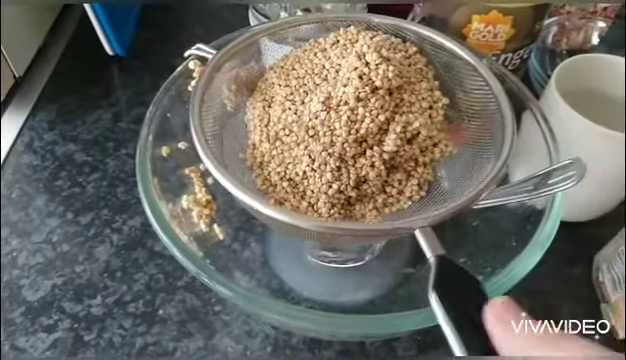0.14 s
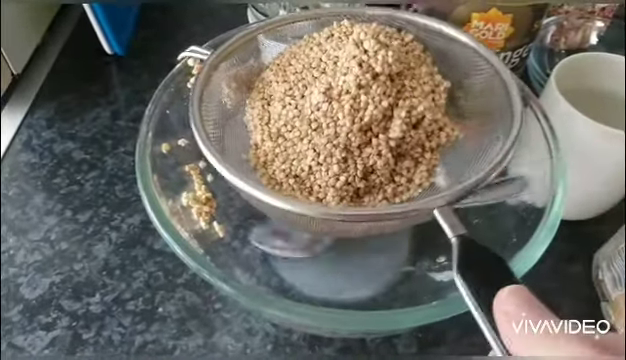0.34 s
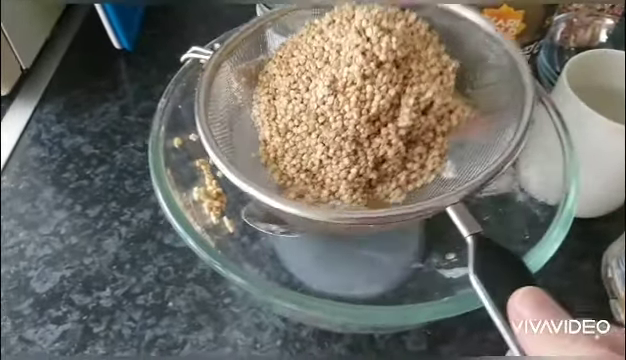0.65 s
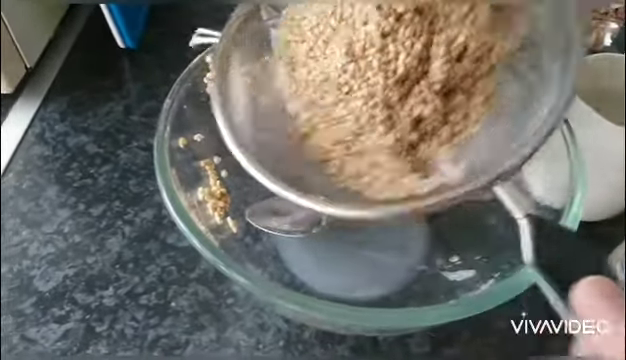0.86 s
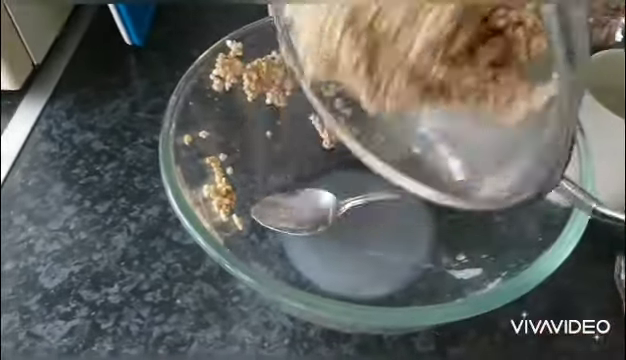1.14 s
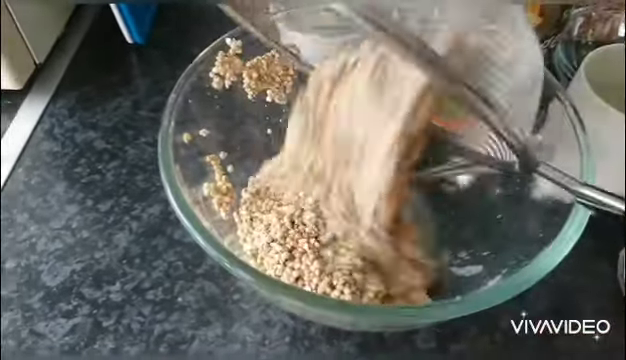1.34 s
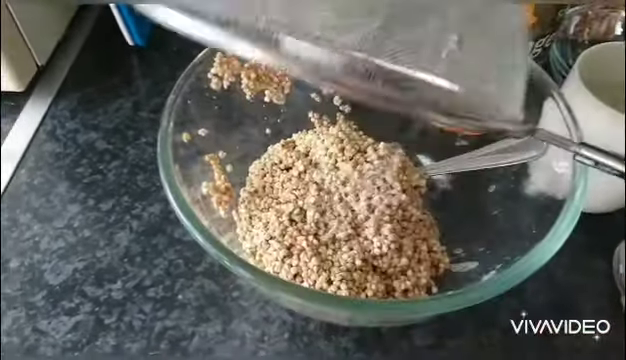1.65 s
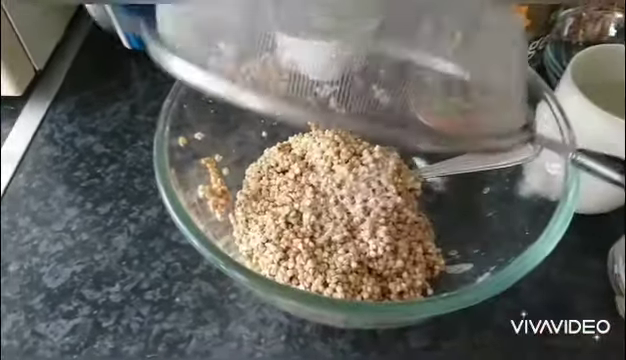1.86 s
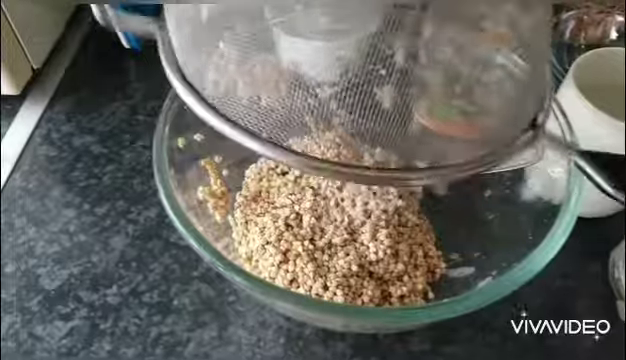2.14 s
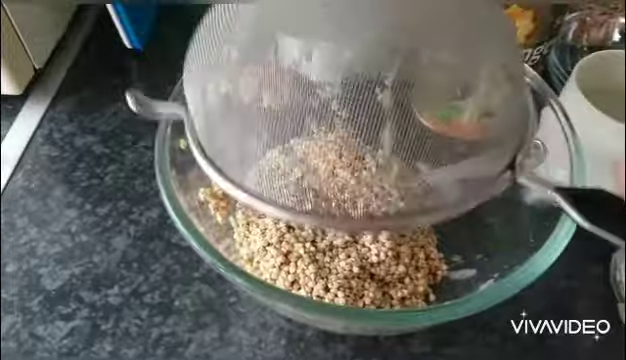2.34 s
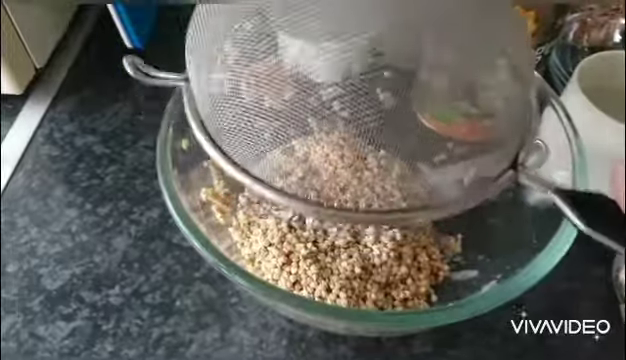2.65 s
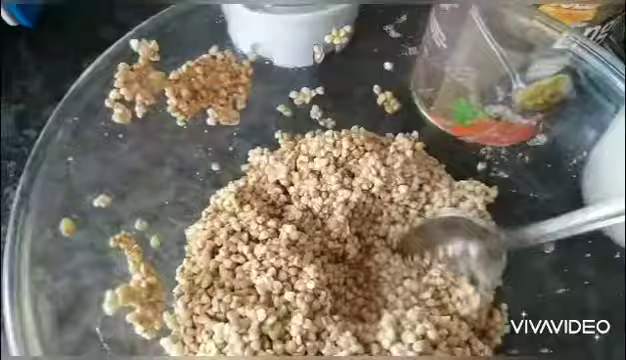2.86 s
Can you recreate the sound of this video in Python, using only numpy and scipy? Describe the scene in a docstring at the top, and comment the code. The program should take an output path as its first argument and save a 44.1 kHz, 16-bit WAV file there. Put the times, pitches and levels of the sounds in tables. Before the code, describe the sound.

A metal sieve scrapes, catches and briefly squeaks on a glass bowl, knocks it, then grain drops with a hiss and soft thud; five sharp rattling raps follow in a small kitchen, heard close in stereo.

```python
"""A steel sieve full of grain drags over the rim of a glass bowl, ticking, catching and squeaking, then knocks it.
The grain is tipped out with a hiss and a soft thud; five knocks on the rim empty the sieve; a hand rustles last.
Decaying modes make the glass and steel ring; tiny random impacts make the friction, mesh rattle and grain.
A small kitchen answers; the phone close by, its left port facing the bowl, limits the hardest knocks."""
import sys
import numpy as np
from scipy import signal
from scipy.fft import rfft, irfft, next_fast_len
from scipy.io import wavfile
from scipy.ndimage import uniform_filter1d, minimum_filter1d, map_coordinates

SR = 44100
rng = np.random.default_rng(int(sys.argv[2]) if len(sys.argv) > 2 else 0)


def materialize(psi):
    """Save the field psi as 16-bit PCM at rate SR to the path in sys.argv[1].

    A 1-D psi becomes a single channel; in a 2-D psi each row is a channel.
    """
    bounded = np.clip(np.atleast_2d(psi).T, -1, 1)
    quanta = np.round(bounded * 32767).astype(np.int16)
    wavfile.write(sys.argv[1], SR, quanta)


N = 132300
T = np.arange(SR * 3 // 4) / SR  # time within one contact (s)
CLACK_T60 = 0.039  # s

# the five main modes of the bowl; where the rim is struck decides how hard each rings: pitch_hz
MAIN_MODES_HZ = [1162, 2111, 3295, 4711, 6330]
# spectrum of the low thud of the heap, also the rumble under the drag: frequency_hz, level_db
HEAP_SPECTRUM = [(25, -33), (45, -12), (68, -3.5), (88, 5), (115, -15), (160, -11.5), (220, -25.5),
                 (500, -23), (1500, -82)]


def amp(db):
    """Decibels to gain."""
    return 10 ** (np.asarray(db) / 20)


def unit(x):
    """Scale to rms 1."""
    return x / np.sqrt(np.mean(x ** 2) + 1e-20)


def along(points, hz):
    """Interpolate (Hz, value) points on a log frequency axis."""
    f, v = np.transpose(points)
    return np.interp(np.log(hz + 1), np.log(f + 1), v)


def level(rows):
    """Gain per sample from (s, dB) rows, practically silent outside them."""
    s, db = np.transpose(rows)
    return amp(np.interp(np.arange(N) / SR, s, db, left=-140, right=-140))


def fade(t60):
    """Exponential decay by 60 dB in t60 seconds."""
    return amp(-60 * T / t60)


def add(out, s, x):
    """Mix x into out at time s, cut at the end of out."""
    part = out[:, round(s * SR):][:, :x.shape[-1]]
    part += x[..., :part.shape[-1]]


def filtered(x, response):
    """Multiply the spectrum of x by a response of frequency."""
    n = x.shape[-1]
    m = next_fast_len(n + SR // 4)
    gain = response(np.fft.rfftfreq(m, 1 / SR))
    return irfft(rfft(x, m) * gain, m)[..., :n]


def wander(points, t, rate):
    """A smooth random curve through `rate` random points per second."""
    return map_coordinates(rng.standard_normal(points), [t * rate], mode="nearest")


def grains(size, rate, spread_db):
    """Two random trains of tiny impacts of uneven strength, `rate` per second."""
    hits = rng.random((2, size)) < rate / SR
    sign = rng.choice([-1, 1], (2, size))
    return hits * sign * amp(spread_db * rng.standard_normal((2, size)))


def coloured(pair, spectrum, tilt_db=0):
    """Two excitations become a partly alike stereo pair of rms 1; tilt_db is per octave."""
    # how alike the two ports are: frequency_hz, correlation (0-1)
    port_likeness = [(100, 0.89), (500, 0.52), (2000, 0.28), (10000, 0.44)]

    def mid_side(hz):
        turn = np.arccos(np.clip(along(port_likeness, hz), -1, 1)) / 2
        colour = amp(along(spectrum, hz) + tilt_db * np.log2(hz + 20))
        return colour * [np.cos(turn), np.sin(turn)]

    mid, side = filtered(pair, mid_side)
    return unit(np.array([mid + side, mid - side]))


def noise(size, spectrum, tilt_db=0):
    """Coloured stereo noise of rms 1."""
    return coloured(rng.standard_normal((2, size)), spectrum, tilt_db)


def background():
    """Steady quiet noise under the whole scene."""
    # spectrum of the background: frequency_hz, level_db
    floor_spectrum = [(25, -25.5), (50, -15), (85, -0.5), (125, -9.5), (210, -5.5), (300, -10),
                      (510, -14.5), (1340, -18), (3300, -19), (7000, -22.5), (11000, -29.5), (12500, -47.5)]
    return amp(-64) * noise(N, floor_spectrum)


def ticks():
    """Light ticks of steel and of late single grains, without any ring of the bowl: short bright and dull bursts."""
    # the ticks: start_s, level_db, dull_part_db (relative to the bright part)
    light_ticks = [(0.0672, -41.5, 14), (.073, -56, 9.5), (1.0643, -34.5, -20), (1.2672, -23, -15),
                   (1.445, -46, 8.5), (1.486, -49.5, -2), (1.5422, -51.5, -1), (1.6156, -58.5, 1.5),
                   (1.648, -56, -2.5), (1.7258, -26, -34), (1.781, -40, -16), (2.2189, -55.5, 10),
                   (2.2394, -19.5, -40.5), (2.4289, -39, -14), (2.457, -40.5, -10), (2.6436, -38, -16.5)]
    # spectrum of the bright part: frequency_hz, level_db
    bright_spectrum = [(300, -42.5), (3500, -42.5), (5000, -9.5), (6200, -4.5), (7050, 4), (7900, -17.5),
                       (11000, -26.5), (13000, -55)]
    # spectrum of the dull part: frequency_hz, level_db
    dull_spectrum = [(200, -19), (1400, -15), (2400, 5.5), (3600, -2.5), (5000, -3), (9000, -12.5),
                     (11500, -22.5), (13000, -35.5)]
    tick_t60 = 0.046  # s
    out = np.zeros((2, N))
    for s, db, dull_db in light_ticks:
        bright = noise(len(T), bright_spectrum)
        dull = amp(dull_db) * noise(len(T), dull_spectrum)
        add(out, s, amp(db) * (bright + dull) * fade(tick_t60))
    return out


def ringing(hz, t60):
    """One decaying mode; unsteady contact makes its phase waver, high modes more than low ones."""
    waver_rad, waver_rate, full_waver_hz = 0.326, 90, 4000  # depth, points per s, full depth from here up
    waver = wander(400, T, waver_rate)
    depth = waver_rad * min(1, hz / full_waver_hz)
    return np.sin(2 * np.pi * (hz * T + rng.random()) + depth * waver) * fade(t60)


def glass(main_db, low_hz=100, vary_db=1):
    """One ring of the bowl as a sum of modes, the main ones struck this hard, those below low_hz muted."""
    # the modes of the bowl: pitch_hz, level_db, t60_s, right_port_db (relative to the left)
    bowl_modes = [(469, -13.5, 0.24, -0.5), (1162, -3, 0.37, 1.5), (2110, 1.5, .3, -5.5),
                  (3293, 1.5, 0.19, -23.5), (4714, 0.5, 0.17, 2.5), (5562, -11.5, .12, -1),
                  (6357, 3, 0.1, -2), (7700, -13.5, 0.12, -4), (8440, -21, .18, -7.5), (8730, -25, .18, -8),
                  (9080, -17.5, 0.1, -4.5), (10140, -21, 0.16, -0.5)]
    fresh_db, fresh_t60 = 7, 0.045  # the ring drops fast at first, while the frame still touches the glass
    out = np.zeros((2, len(T)))
    for hz, db, t60, right_db in bowl_modes:
        muted = 1 / (1 + (low_hz / hz) ** 6)
        struck_db = np.interp(hz, MAIN_MODES_HZ, main_db)  # higher modes follow the last main one
        gain = muted * amp(db + struck_db + rng.normal(0, vary_db))
        out += amp([[0], [right_db]]) * gain * ringing(hz, t60)
    return out * (1 + amp(fresh_db) * fade(fresh_t60))


def slide():
    """The frame slips over the rim in tiny jerks that keep the glass ringing; now and then it catches."""
    # strength of the sliding friction: time_s, level_db
    friction = [(.09, -51.5), (.125, -44), (.15, -38.5), (.175, -45), (.225, -32.5), (.275, -26.5),
                (.32, -25.5), (.37, -36.5), (.42, -38), (.47, -76.5)]
    # the frame catches on the rim: start_s, clack_db, then level_db of each of the five main bowl modes
    rim_catches = [(.138, -41.5, -64, -55.5, -43.5, -55.5, -56.5),
                   (.1975, -51.5, -69, -53.5, -47, -39, -49), (.244, -44, -61.5, -47.5, -26.5, -31, -34),
                   (.2708, -25, -56.5, -23.5, -30, -18.5, -23.5),
                   (.2978, -7.5, -47.5, -23.5, -16, -20.5, -12), (.311, -15.5, -41, -32, -17.5, -18, -23),
                   (.342, -26, -66, -49, -37, -43.5, -23), (.366, -26, -68.5, -49, -35.5, -34, -24.5),
                   (.398, -44.5, -47.5, -57.5, -46, -42, -41)]
    # spectrum of steel rasping on glass: frequency_hz, level_db
    rasp_spectrum = [(30, -49), (90, -4), (250, -18), (480, -9), (1300, -19.5), (1850, 2), (2600, -3),
                     (3500, 0.5), (4200, 2), (5600, -0.5), (7200, 7.5), (8000, -17), (10500, -13),
                     (12500, -40)]
    ring_db, rasp_db, rumble_db = 2, -1, -34.5
    uneven_db, uneven_rate = 2.5, 110  # uneven pressure on the rim: spread, random points per s
    low_hz = 1840  # the frame resting on the rim mutes the low modes
    catch_rise_s = 0.0024  # a catch is a glancing contact: it builds up over a few slips

    slips = grains(N, rate=3200, spread_db=2.5)
    uneven = wander(1500, np.arange(N) / SR, uneven_rate)
    force = level(friction) * amp(uneven_db * uneven)

    ring = glass(np.zeros(len(MAIN_MODES_HZ)), low_hz=low_hz)
    ring = ring / np.linalg.norm(ring[0])
    push = unit(slips[:1]) * force
    out = amp(ring_db) * signal.fftconvolve(push, ring, axes=1)[:, :N]
    rasp = amp(rasp_db) * coloured(slips, rasp_spectrum)
    rumble = amp(rumble_db) * noise(N, HEAP_SPECTRUM)
    out += force * (rasp + rumble)

    for s, clack_db, *main_db in rim_catches:
        clack = amp(clack_db) * noise(len(T), rasp_spectrum) * fade(CLACK_T60)
        add(out, s, (clack + glass(main_db)) * (1 - np.exp(-T / catch_rise_s)))
    return out


def squeak():
    """For a moment the slips lock into a rough tone: a sine whose pitch wanders at random."""
    centre_s, half_s, pitch_hz, squeak_db = .214, .022, 3480, -28.5
    wander_hz, wander_rate = 130, 250  # pitch spread, random points per s
    t = np.arange(N) / SR
    pitch = pitch_hz + wander_hz * wander(3000, t, wander_rate)
    swell = np.exp(-((t - centre_s) / half_s) ** 2)
    return amp(squeak_db) * swell * np.sin(2 * np.pi * np.cumsum(pitch) / SR)


def steel(vary_db=2):
    """The short ring of the sieve's frame as a sum of decaying modes."""
    # the modes of the steel frame: pitch_hz, level_db, t60_s
    frame_modes = [(1800, -27.5, 0.017), (3550, -24, 0.052), (3770, -17, 0.02), (5830, -25.5, 0.017),
                   (6570, -5.5, 0.033), (7300, -3.5, 0.035), (7250, -7, 0.2), (7000, 1, 0.12),
                   (8800, -10.5, 0.18)]
    return sum(amp(db + rng.normal(0, vary_db)) * ringing(hz, t60) for hz, db, t60 in frame_modes)


def rattle():
    """The loose mesh chatters against the frame in tiny impacts and keeps it ringing."""
    # spectrum of the mesh hiss: frequency_hz, level_db
    mesh_spectrum = [(300, -17.5), (800, -10.5), (2500, -18), (5500, -1.5), (6400, 7.5), (7100, 6.5),
                     (8000, -10), (10500, -28), (12500, -53)]
    ring_db, hiss_db, mesh_t60 = 2, 2.5, 0.52  # dB, dB, s
    chatter = grains(len(T), rate=1300, spread_db=8.0)
    ring = unit(signal.fftconvolve(chatter[:1], steel()[None], axes=1)[:, :len(T)])
    hiss = coloured(chatter, mesh_spectrum)
    return (amp(ring_db) * ring + amp(hiss_db) * hiss) * fade(mesh_t60)


def knocks():
    """Each knock clacks the frame, thumps the bowl on the worktop, rings the glass and rattles the mesh."""
    # contacts of the frame with the rim, some a few ms apart within one knock:
    # start_s, clack_db, thump_db, mesh_rattle_db, then level_db of each of the five main bowl modes
    rim_knocks = [(.493, -16.5, -27.5, -75, -58.5, -49, -33.5, -22.5, -28.5),
                  (1.7925, -12, -50.5, -50, -66, -40, -25.5, -28, -20),
                  (1.982, -6, -32.5, -40, -40, -32, -28, -22.5, -26.5),
                  (2.247, -3, -24.5, -38.5, -38.5, -37.5, -30, -27.5, -24),
                  (2.253, -18, -27.5, -64.5, -30.5, -55, -24.5, -28, -19.5),
                  (2.4766, -6, -21, -38, -38.5, -40, -37, -25.5, -19),
                  (2.684, -4.5, -23.5, -41.5, -39.5, -38.5, -24.5, -17.5, -25.5),
                  (2.693, -14, -28, -41, -46, -43.5, -28, -33.5, -19),
                  (2.727, -30.5, -32, -54, -39.5, -44.5, -50, -49.5, -44)]
    # spectrum of the clack: frequency_hz, level_db
    clack_spectrum = [(30, -59), (400, -56), (750, -30.5), (1200, -4), (1500, -14.5), (1900, -0.5),
                      (2700, -17), (3500, 1.5), (4100, -8.5), (5500, -4.5), (6100, -2), (7050, 10.5),
                      (7900, -7), (10500, -9.5), (11700, -26), (13000, -48)]
    # spectrum of the thump: frequency_hz, level_db
    thump_spectrum = [(30, -51), (80, -19), (160, -19), (340, -7), (460, 3), (570, -14), (780, 2.5),
                      (1100, -5.5), (1500, -7), (2500, -6), (6000, -54)]
    frame_db, thump_t60 = -14, 0.033  # frame ring relative to the clack; s
    out = np.zeros((2, N))
    for s, clack_db, thump_db, mesh_db, *main_db in rim_knocks:
        burst = noise(len(T), clack_spectrum) * fade(CLACK_T60)
        clack = amp(clack_db) * (burst + amp(frame_db) * steel())
        thump = amp(thump_db) * noise(len(T), thump_spectrum) * fade(thump_t60)
        add(out, s, clack + thump + amp(mesh_db) * rattle() + glass(main_db))
    return out


def pour(crackle_db=-3):
    """Grain slides off the mesh and lands in the bowl as one heap; single grains tick on the glass."""
    # strength of the falling grain: time_s, level_db
    falling = [(1.02, -70), (1.11, -62), (1.18, -49.5), (1.248, -48), (1.27, -28.5), (1.305, -30),
               (1.34, -40.5), (1.44, -48.5), (1.52, -64.5), (1.7, -75)]
    # strength of the heap landing: time_s, level_db
    landing = [(1.24, -75), (1.275, -42.5), (1.32, -35), (1.37, -48), (1.43, -56.5), (1.54, -61.5),
               (1.64, -78)]
    # spectrum of the grain impacts: frequency_hz, level_db
    grain_spectrum = [(100, -22.5), (450, -11), (700, -6), (1300, -1), (2300, 0), (3700, 5.5), (4800, 0),
                      (6800, 2), (8000, -10.5), (10500, -12.5), (12500, -47)]
    hiss = coloured(grains(N, rate=4300, spread_db=5), grain_spectrum)
    crackle = coloured(grains(N, rate=160, spread_db=3.5), grain_spectrum, tilt_db=3.5)
    thud = level(landing) * noise(N, HEAP_SPECTRUM)
    return level(falling) * (hiss + amp(crackle_db) * crackle) + thud


def grip():
    """The hand shifts on the handle: a soft rustle of many uneven impacts."""
    # strength of the rustle: time_s, level_db
    rustle = [(2.922, -78), (2.934, -51), (2.97, -52.5), (3.0, -57)]
    # spectrum of the rustle: frequency_hz, level_db
    hand_spectrum = [(30, -21), (80, 3), (160, -11), (450, -12), (1000, -12), (3000, -13), (6000, -30),
                     (12000, -37)]
    return level(rustle) * coloured(grains(N, rate=4300, spread_db=11), hand_spectrum)


def kitchen(x, delay_s=.004):
    """A short diffuse tail of decaying noise, different at each port, fed by the left channel."""
    # decay of the room: frequency_hz, t60_s
    room_decay = [(100, 0.34), (500, 0.49), (2000, 0.34), (7000, 0.34), (11000, 0.33)]
    hz, t, z = signal.stft(rng.standard_normal((2, SR // 2)), SR, nperseg=256)
    decay = amp(-60 * t / along(room_decay, hz)[:, None])
    tail = signal.istft(z * decay, SR, nperseg=256)[1]
    tail = np.pad(tail / np.linalg.norm(tail[0]), ((0, 0), (round(delay_s * SR), 0)))
    return signal.fftconvolve(x[:1], tail, axes=1)[:, :N]


def ports(dry):
    """Direct sound at both ports: the right one gets it a little later, weaker and duller."""
    far_db, lag_s = -6.5, 0.00014
    shadow_hz = 1200  # below this, sound bends round the phone

    def response(hz):
        shadow = amp(far_db * hz / (hz + shadow_hz))
        return np.array([np.ones_like(hz), shadow * np.exp(-2j * np.pi * hz * lag_s)])

    return filtered(dry, response)


def scene():
    """All sources, the kitchen and the background as the two ports of the phone hear them."""
    # what the right port hears less, room and background included: frequency_hz, level_db
    right_shade = [(100, -2), (1000, -1.5), (2000, -4), (3500, -3), (5200, -1), (6300, -8), (7200, -14),
                   (8200, -17), (9500, -10), (11500, -20)]
    room_db = -12
    dry = ticks() + slide() + squeak() + knocks() + pour() + grip()
    heard = ports(dry) + amp(room_db) * kitchen(dry) + background()
    return filtered(heard, lambda hz: amp([0 * hz, along(right_shade, hz)]))


def record(dry):
    """A fast limiter holds the peaks down; the top treble rolls off and ends at the band limit."""
    ceiling, hold_s = .55, 0.0026  # ceiling ahead of the roll-off (full scale 1); s
    roll_hz, roll_db_per_hz, top_hz = 11300, .022, 12651
    size = max(2, round(hold_s * SR))
    needed = np.minimum(1, ceiling / (np.abs(dry).max(axis=0) + 1e-9))
    gain = uniform_filter1d(minimum_filter1d(needed, size), size)

    def treble(hz):
        return (hz < top_hz) * amp(-roll_db_per_hz * np.maximum(0, hz - roll_hz))

    return filtered(dry * gain, treble)


dry = scene()
out = record(dry)
materialize(out)
```